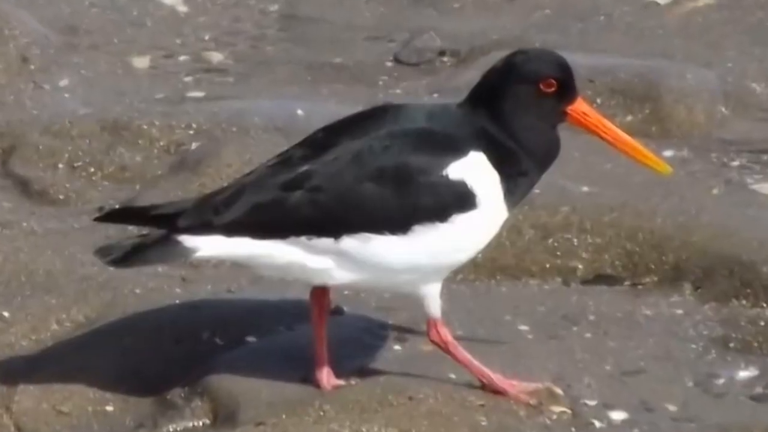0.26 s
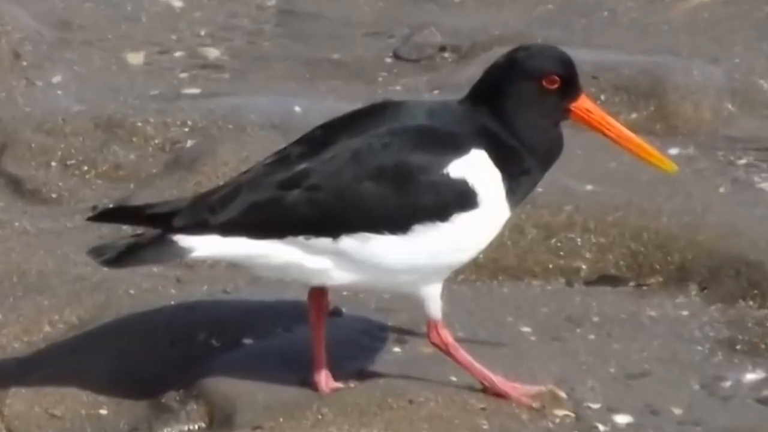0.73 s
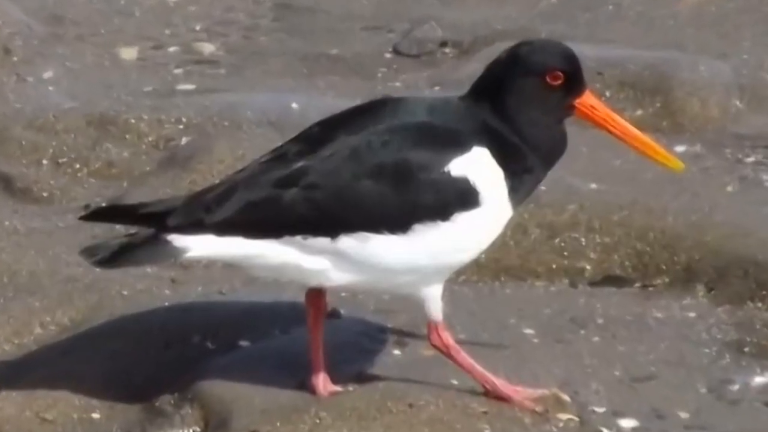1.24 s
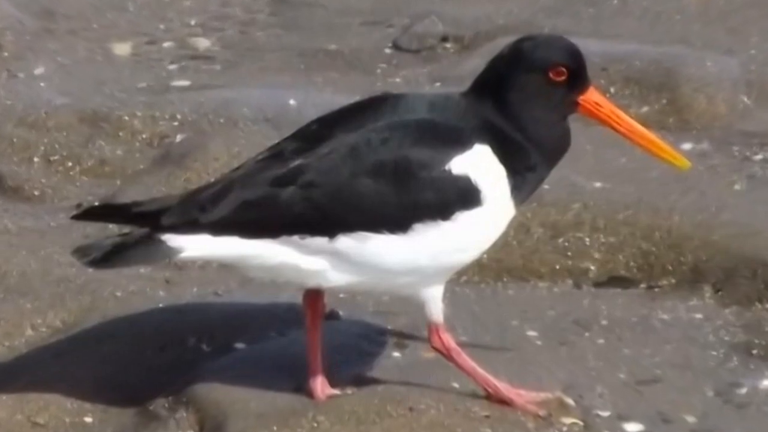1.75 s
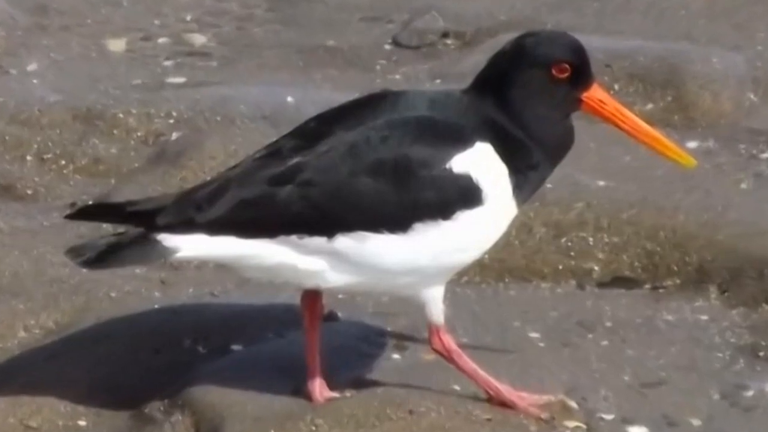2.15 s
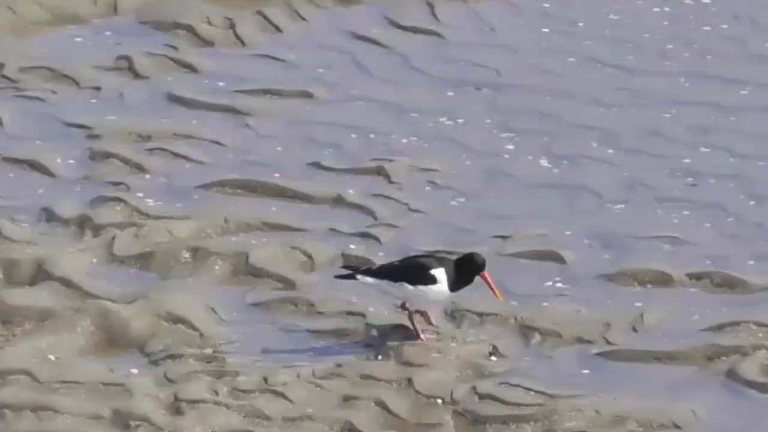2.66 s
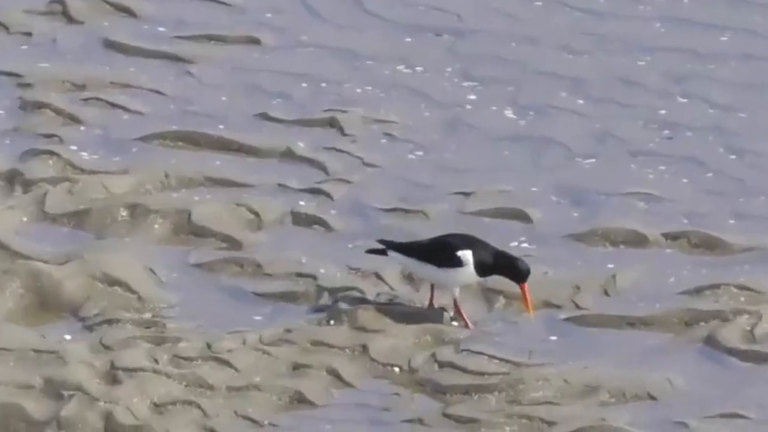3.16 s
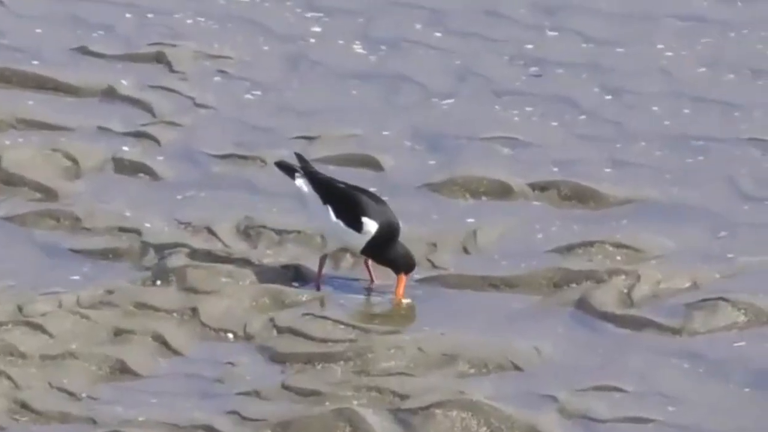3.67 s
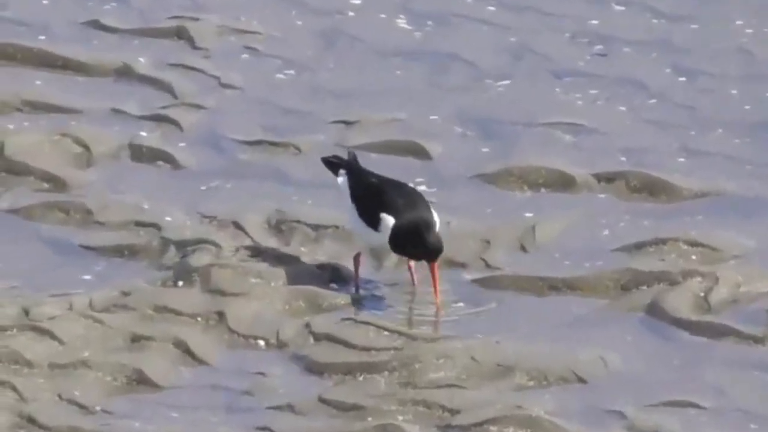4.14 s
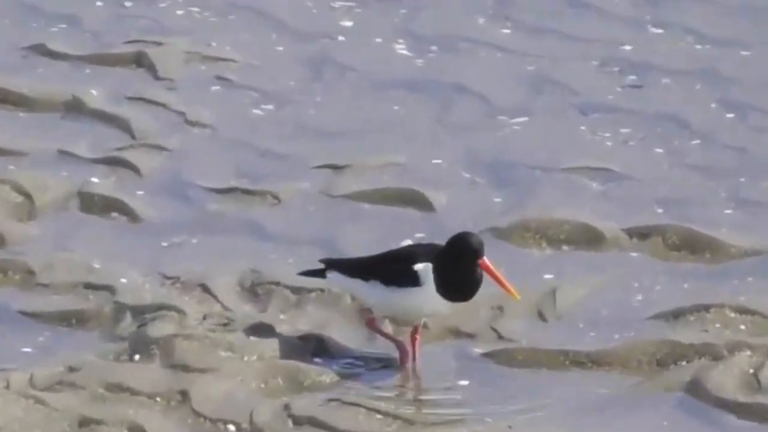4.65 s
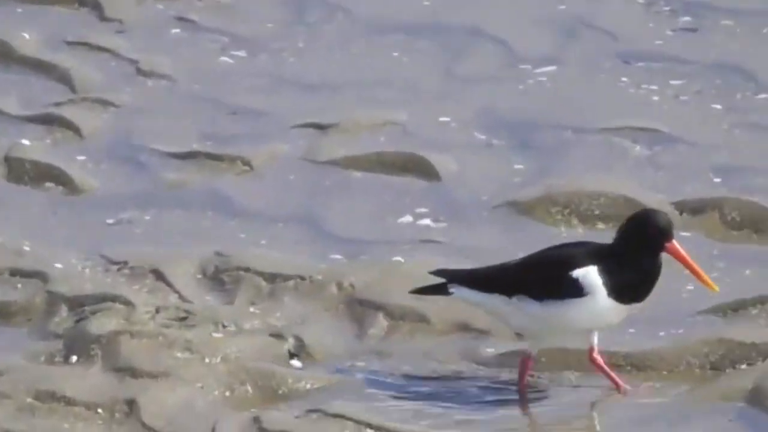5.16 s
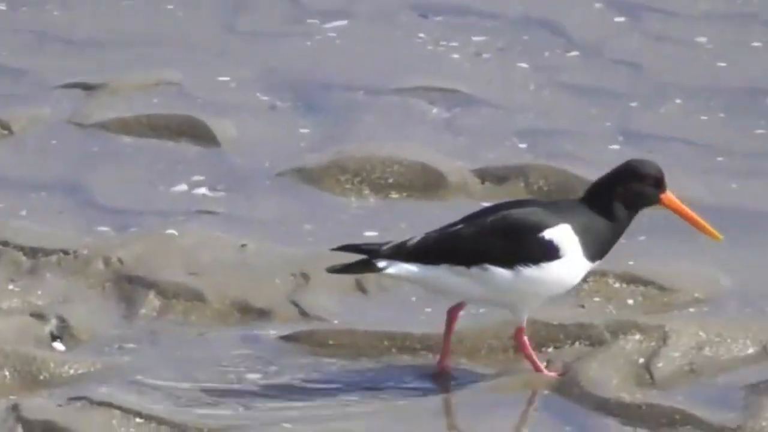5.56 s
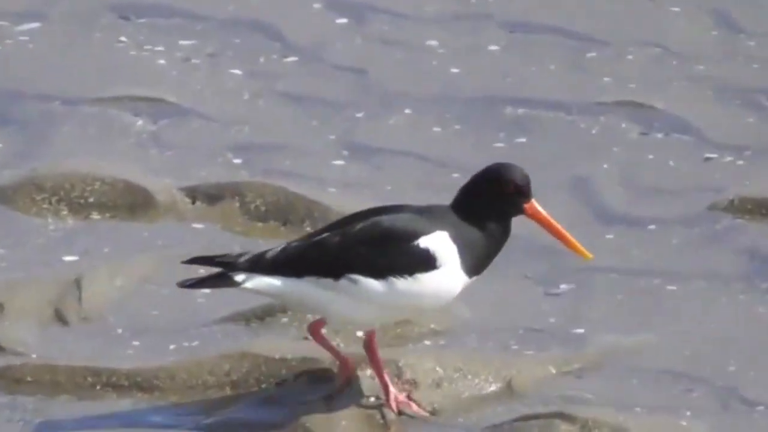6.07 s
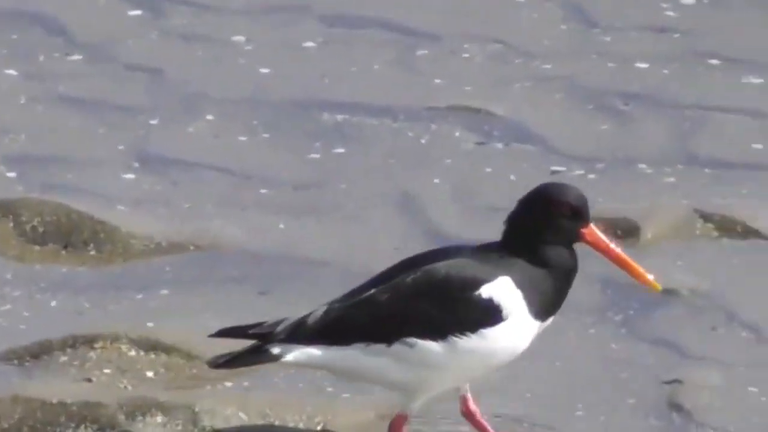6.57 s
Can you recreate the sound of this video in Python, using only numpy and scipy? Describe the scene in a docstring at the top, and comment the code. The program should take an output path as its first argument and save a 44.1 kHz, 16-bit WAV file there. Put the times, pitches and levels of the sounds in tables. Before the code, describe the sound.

An oystercatcher pipes short, sharp, high notes close by as wind thumps the microphone and slowly eases over a distant watery wash.

```python
"""A steady distant wash lies over a mudflat: shaped noise whose soft body and thin hiss drift separately.
A breeze, gusts and eddies buffet the microphone from the start, as noise that reaches higher when they
strike harder, with brief pressure pops; the breeze slowly dies down. Close by, an oystercatcher pipes short
arched notes of gliding harmonics, some led in by a softer, higher note. A small bird chips in falling
whistles, and after four seconds a far shorebird calls in slurred pure tones."""
import sys
import numpy as np
from scipy import signal
from scipy.fft import rfft, irfft
from scipy.io import wavfile

SR = 44100
rng = np.random.default_rng(int(sys.argv[2]) if len(sys.argv) > 2 else 0)


def store_pcm(level_fs):
    """Save levels as 16-bit WAV."""
    pcm = np.round(np.clip(level_fs, -1, 1) * 32767).astype(np.int16)
    wavfile.write(sys.argv[1], SR, np.atleast_2d(pcm).T)


N = 300321
TIME = np.arange(N) / SR

# The hardest eddies striking the microphone: time_s, level_db, sharpness (0-1)
EDDIES = [(0.074, -21, 0.96), (0.091, -25, 0.86), (0.127, -25, 0.2), (.228, -29, .85), (0.301, -23, 0.6),
          (0.322, -22.5, 0.95), (0.334, -21.5, 1), (0.534, -29, 0.06), (.647, -30, 1), (0.688, -21, 0.81),
          (1.275, -28, .9), (1.36, -23.5, 0.04), (1.424, -30.5, 0), (1.508, -22, 0.55), (1.534, -17.5, .75),
          (1.554, -18.5, 0.92), (1.784, -24, 0.72), (1.93, -26, 0.1), (2.153, -34.5, 0), (2.282, -33, 0.76),
          (2.359, -31.5, 0), (2.502, -34.5, 0.6), (2.681, -24, 0.28), (2.78, -20, 0.7),
          (2.812, -21.5, 0.14), (2.867, -29, 0), (2.958, -21.5, 0.14), (3.138, -19, .85), (3.281, -29, 0.5),
          (4.244, -36.5, 0.44), (4.396, -44, 0), (5.877, -36, 0.7), (6.123, -29.5, 0.72)]


def amp(db):
    """Decibels to gain."""
    return 10 ** (np.asarray(db) / 20)


def smooth(x, seconds):
    """Moving average under a bell of this whole length."""
    bell = signal.windows.hann(2 * max(int(seconds * SR / 2), 1) + 1)
    padded = np.pad(x, len(bell) // 2, mode="edge")
    return signal.fftconvolve(padded, bell / bell.sum(), "valid")


def follow(rows, at):
    """Every column of a table after the first, joined by straight lines."""
    knots, *columns = np.transpose(rows)
    return [np.interp(at, knots, column) for column in columns]


def colour(x, spectrum):
    """Filters x by a spectrum drawn over log frequency, and brings it to unit power."""
    hz, db = np.transpose(spectrum)
    log_bins = np.log(np.fft.rfftfreq(N, 1 / SR) + 1)
    gain = amp(np.interp(log_bins, np.log(hz), db))
    y = irfft(rfft(x) * gain, N)
    return y / y.std()


def wander(count, seconds):
    """Smoothed random drift of unit size."""
    x = smooth(rng.standard_normal(count + SR), seconds)
    return (x / x.std())[SR // 2:][:count]


def add(mix, s, sound):
    """Mixes a sound in at time s."""
    part = mix[..., round(s * SR):][..., :sound.shape[-1]]
    part += sound[..., :part.shape[-1]]


def from_top(u, top_at):
    """Distance from the top of a call: 0 there, 1 at either end."""
    return np.maximum((top_at - u) / top_at, (u - top_at) / (1 - top_at))


def wash(body_trim_db=3.0, hiss_trim_db=20.5, split_hz=2800):
    """Far water and air: a soft body and a thin hiss, split from one noise, that drift separately."""
    # Distant wash spectrum: frequency_hz, relative_density_db (per Hz)
    wash_spectrum = [(20, -2.5), (90, -0.5), (300, -5), (600, 0), (1000, 0.5), (1700, -2), (3000, -9),
                     (4400, -19), (6500, -20), (7800, -25.5), (9300, -33.5), (11000, -38), (14000, -42),
                     (15700, -56)]
    # Drift of the body below the split: time_s, level_db (before its trim)
    body_drift = [(0, -50), (4.45, -51), (4.9, -54), (6.81, -53)]
    # Drift of the hiss above the split: time_s, level_db (before its trim)
    hiss_drift = [(0, -70.5), (.5, -70.5), (1.0, -68.5), (1.4, -70), (2.15, -67.5), (2.6, -70.5),
                  (3.2, -71.5), (3.85, -67.5), (4.7, -72), (6.81, -72.5)]
    noise = colour(rng.standard_normal(N), wash_spectrum)
    body = signal.sosfiltfilt(signal.butter(2, split_hz, fs=SR, output="sos"), noise)
    hiss = noise - body
    body_db = follow(body_drift, TIME)[0] + body_trim_db
    hiss_db = follow(hiss_drift, TIME)[0] + hiss_trim_db
    return body * amp(body_db) + hiss * amp(hiss_db)


def wind(gust_trim_db=-1, lump_db=3, flutter_db=5, swirl_db=-14, swirl_width=3.3, hard_db=-27, span_db=26):
    """Fluttering gusts and single eddies thump on the microphone; harder strikes make higher noise."""
    # The breeze, slowly dying down: time_s, level_db (before lumps and flutter)
    breeze = [(0, -35.5), (.18, -43), (.25, -35), (.78, -40.5), (.86, -64), (1.15, -43.5), (1.4, -44.5),
              (1.9, -49), (2.07, -66), (2.3, -43), (2.47, -43), (2.57, -71), (2.82, -53), (3.38, -53.5),
              (3.75, -62.5), (5.3, -60.5), (5.95, -53.5), (6.81, -66)]
    # Gusts: start_s, length_s, level_db (before trim and flutter)
    gusts = [(0.033, .06, -26), (.292, 0.042, -28.5), (0.424, 0.031, -30.5), (.705, 0.11, -32.5),
             (1.272, 0.13, -37.5), (1.485, .075, -27.5), (1.669, .025, -36), (1.844, 0.052, -31),
             (2.652, 0.037, -32), (2.76, 0.21, -35.5), (3.108, 0.032, -31), (3.35, 0.032, -39.5),
             (3.596, 0.059, -39.5), (4.235, 0.02, -38.5), (5.169, 0.033, -42), (5.522, 0.038, -41.5),
             (5.864, 0.043, -35), (6.079, 0.046, -39), (6.468, 0.026, -35), (6.524, 0.038, -44)]
    # Buffeting from light air: frequency_hz, relative_density_db (per Hz)
    light_air = [(15, -9), (30, -17), (55, 0.5), (85, 5.5), (160, 0.5), (280, -6.5), (450, -18.5),
                 (800, -40), (1600, -60), (4000, -85)]
    # Buffeting from hard air: frequency_hz, relative_density_db (per Hz)
    hard_air = [(15, -25), (30, -19), (70, -21), (160, 4), (320, 1.5), (550, -9), (800, -22), (1300, -33.5),
                (2200, -31), (5000, -91)]
    gust_rise_s, gust_die_s = 0.006, 0.012
    eddy_s = 0.0054  # full width of the core at half power
    breeze_db = follow(breeze, TIME)[0] + lump_db * np.tanh(wander(N, 0.066))
    power = amp(breeze_db) ** 2
    for s, length, db in gusts:
        outside = np.maximum((s - TIME) / gust_rise_s, (TIME - s - length) / gust_die_s)
        power += (amp(db + gust_trim_db) * np.exp(-np.maximum(outside, 0))) ** 2
    power *= amp(flutter_db * np.tanh(wander(N, 0.021))) ** 2
    for s, db, _ in EDDIES:
        away = (2 * (TIME - s) / eddy_s) ** 2
        near = away < 400
        # a tight core inside a wider, weaker swirl
        core = 2 ** -away[near]
        swirl = amp(swirl_db) ** 2 * 2 ** -(away[near] / swirl_width ** 2)
        power[near] += amp(db) ** 2 * (core + swirl)
    # half hard at hard_db; light turns to hard across span_db
    hardness = np.clip(0.5 + (10 * np.log10(power) - hard_db) / span_db, 0, 1)
    turbulence = rng.standard_normal(N)
    air = (1 - hardness) * colour(turbulence, light_air) + hardness * colour(turbulence, hard_air)
    # level the noise's own swells so that the wind's power sets the loudness
    own_power = smooth(air ** 2, 0.028) + 1e-6
    return air * np.sqrt(power / own_power)


def pops(pop_db=4, blunt_s=0.001, sharp_s=0.00032, leak_hz=150):
    """A sharp eddy's core crosses the port in one quick suck and push; the slowest part leaks away."""
    out = np.zeros(N)
    t = np.arange(-SR // 200, SR // 200) / SR
    for s, db, sharpness in EDDIES:
        u = t / (blunt_s + (sharp_s - blunt_s) * sharpness)
        pressure = u * np.exp((1 - u ** 2) / 2)
        add(out, s + t[0], amp(db + pop_db) * sharpness ** 0.73 * pressure)
    return signal.sosfilt(signal.butter(2, leak_hz, "highpass", fs=SR, output="sos"), out)


def throat_db(hz):
    """Gain of the throat and bill that the harmonics glide through."""
    # Throat and bill response: frequency_hz, gain_db
    throat = [(1700, -5.5), (2700, -0.5), (3600, -3), (4700, 2), (5400, 1), (6300, -16), (7200, -1),
              (8100, -2.5), (9300, -9), (10800, -12.5), (11800, -23), (13000, -48), (16000, -53)]
    return follow(throat, hz)[0]


def arch(u, length):
    """Share of the top pitch that a note lacks: an opening flick, S-shaped climb, fall and final collapse."""
    flick_sag, climb_sag, fall_sag, collapse_sag = 0.34, 0.1414, 0.206, 0.215  # shares of the top pitch
    flick_s, climb_bend, fall_power, collapse_power = 0.0005, 0.86, 2.25, 5.57
    top_at = 0.39 + 1.33 * length  # share of the length; later in longer notes
    away = from_top(u, top_at)
    flick = flick_sag * np.exp(-u * length / flick_s)
    climb = climb_sag * np.sin(np.pi / 2 * climb_bend * away) ** 2 + flick
    fall = fall_sag * away ** fall_power + collapse_sag * away ** collapse_power
    return np.where(u < top_at, climb, fall)


def oystercatcher(notes, harmonics_db, swell, jitter=0.0012, shimmer=0.023, rasp_db=-51, edge_db=-36):
    """Each note is one arch of pitch whose harmonics sweep through the throat's resonances."""
    push_db_per_sag = -45  # a note is loudest where it is highest
    start_burst_db, burst_s = 11, 0.00061
    out = np.zeros(N)
    for s, length, top_hz, db, overtones_db, tilt_db in notes:
        u = np.linspace(0, 1, int(length * SR))
        sag = arch(u, length)
        hz, push_db = top_hz * (1 - sag), push_db_per_sag * sag
        phase = 2 * np.pi * np.cumsum(hz * (1 + jitter * wander(len(u), 0.0005))) / SR
        # the rasp is boosted towards both ends of the note
        rasp = amp(rasp_db + push_db) + amp(edge_db) * (2 * u - 1) ** 8
        breath_filter = signal.butter(4, 11500, fs=SR, output="sos")  # low-pass, Hz
        note = rasp * signal.sosfilt(breath_filter, rng.standard_normal(len(u)))
        for k, harmonic_db in enumerate(harmonics_db, 1):
            bright_db = (k > 1) * (overtones_db + tilt_db * (k - 2))
            glide_db = throat_db(k * hz) - throat_db(top_hz)
            effort_db = push_db * (1 + swell * (k - 1) * (k - 2))  # upper harmonics need the hardest push
            level = amp(harmonic_db + bright_db + glide_db + effort_db)
            level = level * (1 + shimmer * wander(len(u), 0.0022))
            note += np.sqrt(2) * level * np.sin(k * phase)
        # a note starts with a brief burst
        burst_db = start_burst_db * np.exp(-(u * length / burst_s) ** 2)
        add(out, s, amp(db + burst_db) * note * signal.windows.tukey(len(u), 0.03))
    return out


def small_bird(split_hz=300, waver=0.0036, split_waver=0.38):
    """A quick flick up and a falling whistle that levels off; sometimes a second voice beats against it."""
    # Chips: start_s, length_s, top_hz, end_hz, level_db, octave_overtone_db, second_voice_strength (0-1)
    chips = [(0.413, 0.062, 5090, 4610, -40, -42, 0.65), (1.413, 0.053, 4960, 4410, -42, -33, 0),
             (2.093, 0.064, 5170, 4350, -44, -32, 0.3), (3.137, 0.059, 4900, 4430, -45.5, -26, 0.2),
             (3.92, 0.049, 5180, 4540, -46.5, -22, 0), (5.169, 0.054, 4960, 4390, -42.5, -28, 0),
             (5.982, 0.054, 5290, 4430, -37.5, -37, 0), (6.009, 0.02, 3800, 3450, -54, -26, 0),
             (6.741, 0.055, 5010, 4500, -44, -35, 0)]
    # a chip peaks in pitch, then in level, then levels off (shares of its length)
    top_at, loud_at, flat_at = 0.16, 0.35, 0.87
    start_height, start_db, end_db = 0.32, -24, -19
    out = np.zeros(N)
    for s, length, top_hz, end_hz, db, octave_db, second in chips:
        u = np.linspace(0, 1, int(length * SR))
        height = np.sin(np.pi / 2 * np.interp(u, [0, top_at, flat_at], [start_height, 1, 0])) ** 2
        course_db = np.where(u < loud_at, start_db, end_db) * from_top(u, loud_at) ** 2
        hz = (end_hz + (top_hz - end_hz) * height) * (1 + waver * wander(len(u), 0.002))
        phase = 2 * np.pi * np.cumsum(hz) / SR
        beat_hz = split_hz * (1 + split_waver * wander(len(u), 0.005))
        beat = 2 * np.pi * np.cumsum(beat_hz) / SR
        # the second voice lies a little lower and dies as the pitch falls
        second_voice = second * np.sqrt(height) * np.sin(phase - beat)
        voice = np.sin(phase) + amp(octave_db) * np.sin(2 * phase) + second_voice
        add(out, s, np.sqrt(2) * amp(db + course_db) * signal.windows.tukey(len(u), 0.2) * voice)
    return out


def far_bird(waver=0.013, flicker_db=3.0):
    """A slurred whistle, left without overtones by distance and flickering in the moving air."""
    # Far shorebird: start_s, length_s, top_hz, level_db
    far_calls = [(4.095, 0.15, 2530, -55), (4.48, .18, 2550, -52), (5.003, 0.17, 2580, -51),
                 (5.41, 0.17, 2570, -53), (5.894, .18, 2540, -54), (6.358, 0.19, 2530, -53.5)]
    # the slur climbs to a top (share of its length) and drops; both ends are lower and softer
    slur_top_at, slur_start, slur_end, ends_db = 0.69, 0.855, 0.81, -13.5  # ends as shares of top pitch
    out = np.zeros(N)
    for s, length, top_hz, db in far_calls:
        u = np.linspace(0, 1, int(length * SR))
        pitch = np.interp(u, [0, slur_top_at, 1], [slur_start, 1, slur_end])
        course_db = ends_db * from_top(u, slur_top_at) + flicker_db * wander(len(u), 0.014)
        hz = top_hz * pitch * (1 + waver * wander(len(u), 0.0037))
        phase = 2 * np.pi * np.cumsum(hz) / SR
        whistle = np.sqrt(2) * amp(db + course_db) * np.sin(phase)
        add(out, s, whistle * signal.windows.tukey(len(u), 0.15))
    return out


def shore(x, t60=0.1):
    """Faint scatter from the banks of the flat: a noise tail that falls 60 dB in t60 seconds."""
    t = np.arange(SR // 2) / SR
    tail = rng.standard_normal(len(t)) * amp(-60 * t / t60)
    return signal.fftconvolve(x, tail / np.linalg.norm(tail))[:N]


def scene():
    """The near bird almost dry, the far ones wetter, over wash and wind; all in the centre."""
    # Full piping notes: start_s, length_s, top_pitch_hz, level_db, overtones_db,
    # tilt_db (per further harmonic)
    full_notes = [(0.131, 0.069, 2725, -27, 0, 1), (0.762, 0.064, 2702, -24.5, 0, -0.5),
                  (1.496, .064, 2698, -27.5, -1.4, 0.5), (2.049, 0.066, 2700, -24.5, -1.5, 0.5),
                  (2.645, 0.076, 2728, -24, -3, -2), (3.301, 0.071, 2702, -30.5, 1.5, 0),
                  (4.607, 0.067, 2692, -26, 2, -7.5), (5.578, 0.086, 2687, -26, 0.5, -0.2),
                  (6.281, 0.073, 2677, -29, -0.9, 1.2), (6.802, 0.054, 2620, -32.5, -7.5, -1)]
    # Softer, higher notes, some leading into a full one: columns as in the full notes
    soft_notes = [(0.6996, 0.05, 2916, -35, -1.5, 1), (1.751, .051, 2910, -35, -3, 3),
                  (2.429, 0.045, 3050, -43.5, 0.5, -1), (3.248, 0.056, 2845, -40, 2.5, 0),
                  (4.439, .040, 2870, -68, 15, -0.5), (6.086, 0.058, 3030, -60, -2, 0)]
    # Harmonics before the throat, from the fundamental up, in full and in soft notes: level_db
    full_harmonics_db = [0, -4.5, -3.5, -5, 6.5, -10]
    soft_harmonics_db = [0.5, -8, -14, -7, 1]
    pips = oystercatcher(full_notes, full_harmonics_db, swell=0.27)
    pips += oystercatcher(soft_notes, soft_harmonics_db, swell=0.086)
    chips, far = small_bird(), far_bird()
    scatter = shore(amp(-47) * pips + amp(-22) * chips + amp(-31) * far)
    mix = wash() + wind() + pops() + pips + chips + far + scatter
    return np.tile(mix, (2, 1))


def record(dry):
    """The recorder's notches, cut by subtracting resonances, then a steep low-pass band limit."""
    # Notches in the recorder's response: centre_hz, width_hz, share_removed (0-1)
    notches = [(5720, 950, 0.75), (6940, 160, 0.83)]
    edge_hz = 15720
    for hz, width, share in notches:
        b, a = signal.iirpeak(hz, hz / width, fs=SR)
        dry = dry - share * signal.lfilter(b, a, dry)
    low_pass = signal.firwin(511, edge_hz, window=("kaiser", 9), fs=SR)
    return signal.oaconvolve(dry, low_pass[None], "same")


dry = scene()
out = record(dry)
store_pcm(out)
```